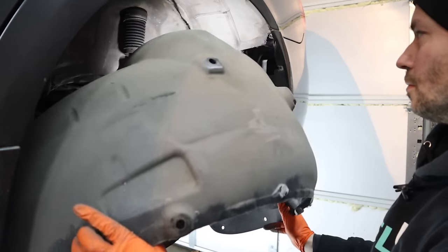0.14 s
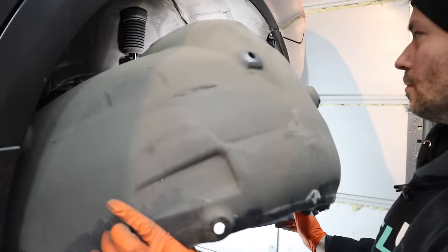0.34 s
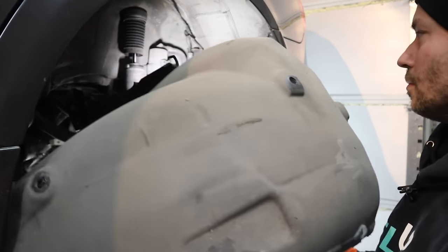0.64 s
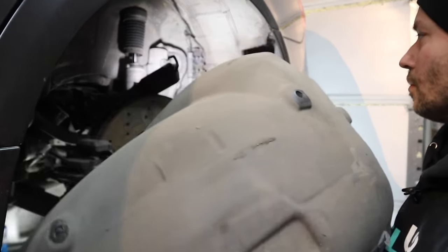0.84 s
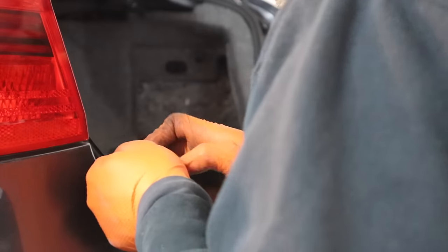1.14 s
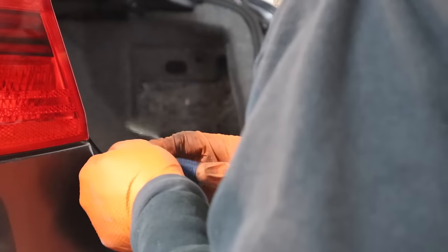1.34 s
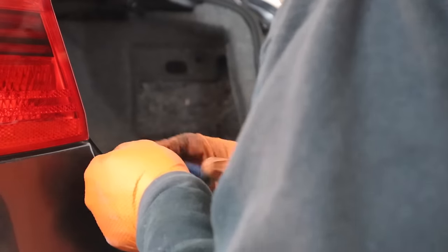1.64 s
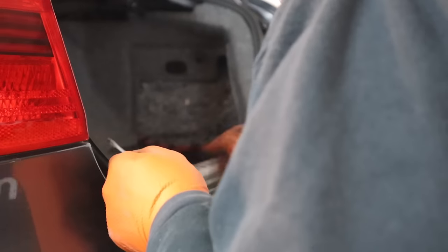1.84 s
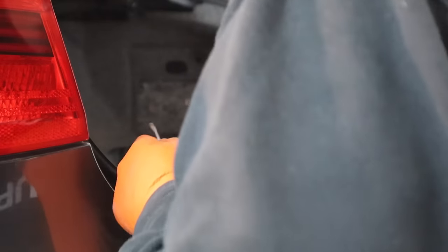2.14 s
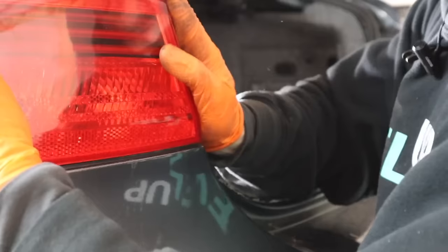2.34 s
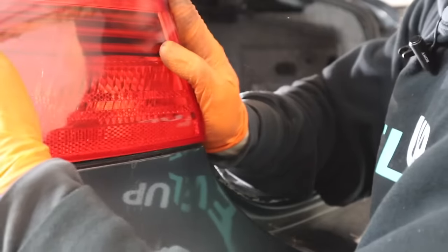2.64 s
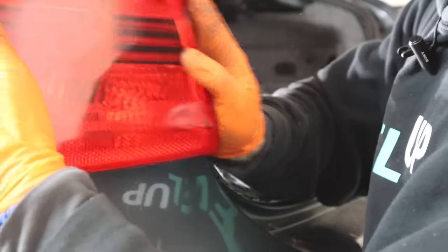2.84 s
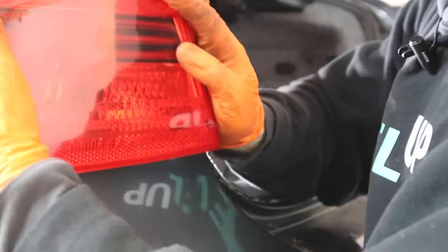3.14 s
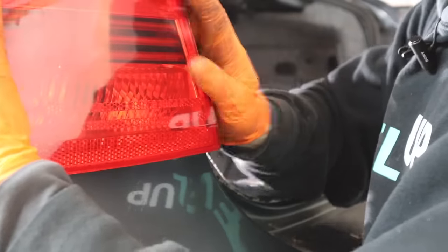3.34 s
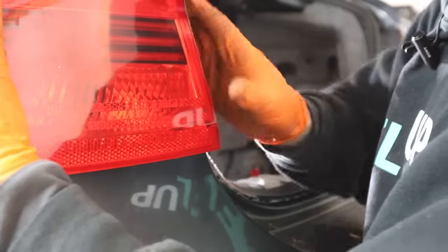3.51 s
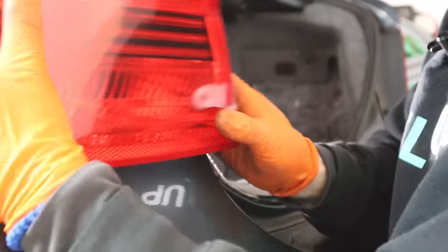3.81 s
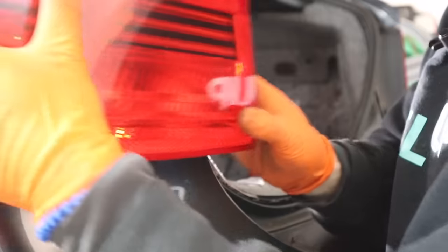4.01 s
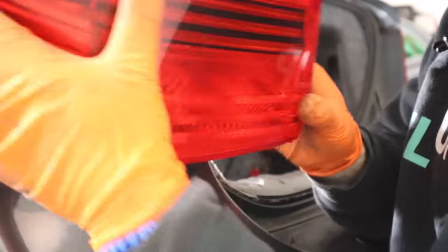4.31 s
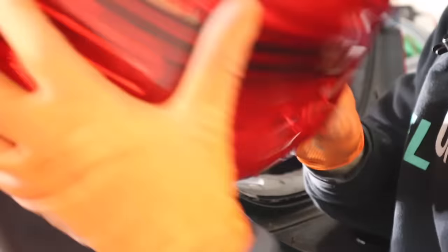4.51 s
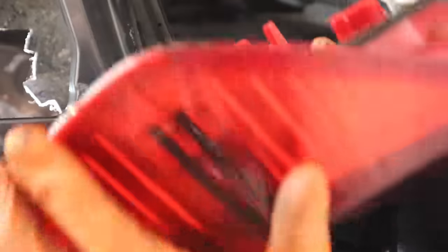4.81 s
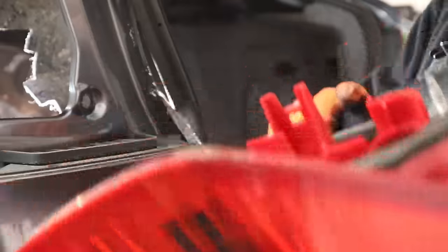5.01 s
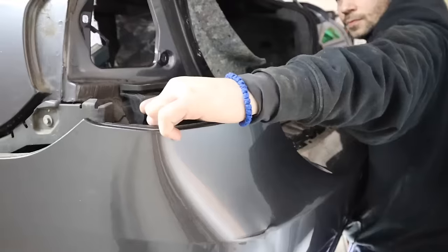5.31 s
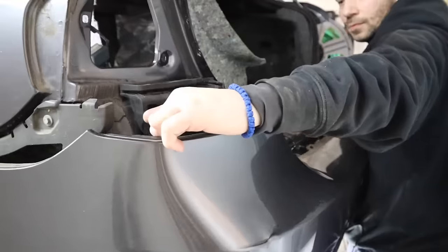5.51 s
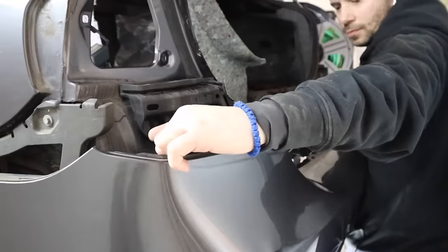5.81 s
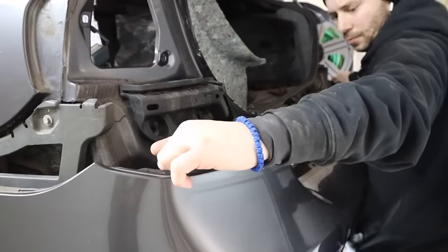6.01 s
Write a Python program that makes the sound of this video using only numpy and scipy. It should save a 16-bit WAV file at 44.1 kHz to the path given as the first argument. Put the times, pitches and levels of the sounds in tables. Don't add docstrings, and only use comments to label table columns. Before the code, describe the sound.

In a small garage, a plastic car panel thumps and knocks loose, clips snap sharply, then a lamp housing is wriggled and knocked off.

```python
import sys
import numpy as np
from scipy import signal
from scipy.fft import rfft, irfft, next_fast_len
from scipy.io import wavfile

SR = 44100
rng = np.random.default_rng(int(sys.argv[2]) if len(sys.argv) > 2 else 0)


def master(y):
    cut = np.clip(np.atleast_2d(y).T, -1, 1)
    pcm = np.round(cut * 32767)
    wavfile.write(sys.argv[1], SR, pcm.astype(np.int16))


def boost_factor(decibels):
    exponent = np.asarray(decibels, float) / 20
    return 10 ** exponent


N = 271213


def rms_one(x):
    return x / np.sqrt(np.mean(x ** 2) + 1e-20)


def band(x, lo_hz, hi_hz):
    return signal.sosfilt(signal.butter(2, [lo_hz, min(hi_hz, .45 * SR)], "band", fs=SR, output="sos"), x)


def peak(x, hz, width_hz):
    r = np.exp(-np.pi * width_hz / SR)
    numerator = np.array([1, 0, -1]) * (1 - r * r) / 2
    return signal.lfilter(numerator, [1, -2 * r * np.cos(2 * np.pi * hz / SR), r * r], x)


def coloured(x, spectrum):
    hz, level_db = np.transpose(spectrum)
    size = next_fast_len(len(x))
    f = np.maximum(np.arange(size // 2 + 1) * SR / size, 1)
    gain = boost_factor(np.interp(np.log(f), np.log(hz), level_db))
    return rms_one(irfft(rfft(x, size) * gain, size)[:len(x)])


def grit(size, per_s, spread_db):
    sizes = boost_factor(spread_db * np.minimum(rng.exponential(1, size), 4)) * rng.choice([-1, 1], size)
    clicks = sizes * (rng.random(size) < per_s / SR)
    return rms_one(clicks + 0.6 * rng.standard_normal(size))


def add(out, start_s, sound):
    i = int(start_s * SR)
    out[i:i + len(sound)] += sound[:N - i]


# freq_hz, level_db
HISS = [(12, -38), (22, -8.5), (120, -0.5), (206, -5), (700, -8), (1820, -11.5), (14700, -17.5),
        (16000, -13.5)]


def hiss():
    return boost_factor(-56) * coloured(rng.standard_normal(N), HISS)


def garage(x):
    t60_s, dull_hz, thin_hz, level_db = 0.29, 3000, 280, -10
    t = np.arange(SR // 2) / SR
    noise = signal.lfilter(*signal.butter(1, thin_hz, "high", fs=SR), rng.standard_normal(len(t)))
    dull = signal.lfilter(*signal.butter(1, dull_hz, fs=SR), noise)
    tail = dull + (noise - dull) * boost_factor(-90 * t / t60_s)
    tail = tail * boost_factor(-60 * t / t60_s) * np.minimum(t / 0.01, 1)
    return boost_factor(level_db) * signal.fftconvolve(x, tail / np.sqrt(np.sum(tail ** 2)))[:N]


# freq_hz, width_hz, level_db
LINER = [(290, 170, 21.5), (546, 3, 9), (880, 65, 21), (1230, 8.7, -27), (1350, 330, 19), (1660, 50, 6.5),
         (1940, 46, -11.5), (2610, 280, -1), (3560, 87, -9.5), (4550, 42, -15)]
CLIPS = [(251, 23, 5), (590, 17, -25), (877, 88, -1.5), (1640, 320, 8), (1970, 8.8, -30), (2600, 38, -29),
         (3000, 136, -2)]
LAMP = [(221, 19, -2), (412, 91, 5), (775, 12.4, 6.5), (1230, 12, -20), (1620, 29, -18), (2120, 30, -25)]
LAMP_FREE = [(500, 49, 1), (625, 21, 8.5), (883, 22, 2), (1330, 64, -10), (1730, 87, -9.5), (2190, 48, -10),
             (3270, 520, -19)]
PARTS = [LINER, CLIPS, LAMP, LAMP_FREE]


def body(x, modes):
    top_db = max(mode[2] for mode in modes)
    return sum((-1) ** k * boost_factor(db - top_db) * peak(x, hz, width_hz)
               for k, (hz, width_hz, db) in enumerate(modes))


# start_s, pressure_db, speed_db
RUB = [
    [(0, -35, -1.5), (.256, -45.5, 4), (.468, -46.5, -13), (.638, -51, -10), (.728, -39.5, -10),
     (.818, -40.5, -9), (.98, -47.5, 0)],
    [(.98, -45, -1), (1.156, -53, 12.5), (1.4, -45, -2), (1.464, -37, 14), (1.544, -55, 0),
     (1.746, -45, -16), (1.906, -34.5, 2.5), (2.068, -54, 3), (2.28, -48.5, 12)],
    [(2.28, -42, 4), (2.344, -49, 0), (2.468, -40, -1.5), (2.57, -38, -1.5), (2.67, -45, -0.5),
     (2.738, -42.5, -2), (2.922, -34.5, 8.5), (3.198, -44.5, -0.5), (3.42, -43, 5.5), (3.48, -51.5, 0.5),
     (3.62, -59, 8), (3.67, -45, 4), (3.78, -55.5, 7), (4.02, -45, 3), (4.12, -57, 2), (4.22, -63, 7.5)],
    [(4.22, -68, 7), (4.538, -48.5, 8.5), (4.678, -57.5, 10), (4.89, -52.5, 17), (5.016, -46, 11),
     (5.134, -52, 15.5), (5.19, -58, 16)],
]
# freq_hz, level_db_per_hz
FIZZ = [(2350, -5), (4000, -0.5), (5500, -4), (6070, -4.5), (10500, -8), (14500, -9.5), (16000, -10)]


def rub(rows, modes):
    start_s, press_db, speed_db = np.transpose(rows)
    t = np.arange(int(start_s[0] * SR), int(start_s[-1] * SR)) / SR
    slips = grit(len(t), per_s=2700, spread_db=7.5)
    rung = body(slips, modes)
    rumble = rms_one(band(rung, 78, 1130)) + 1.15 * rms_one(band(slips, 79, 750))
    rasp = rms_one(band(rung, 920, 4400)) + 0.69 * rms_one(band(slips, 795, 4900))
    sheen = coloured(grit(len(t), per_s=8300, spread_db=1.5), FIZZ)
    layers = [(rumble, 5 - speed_db), (rasp, -1 + 0.169 * speed_db), (sheen, -7.5 + 0.71 * speed_db)]
    return sum(boost_factor(np.interp(t, start_s, press_db + db) - 9.0) * rms_one(x) for x, db in layers)


def rubbing():
    out = np.zeros(N)
    for rows, modes in zip(RUB, PARTS):
        add(out, rows[0][0], rub(rows, modes))
    return out


# start_s, end_s, freq_hz, width_hz, start_db
HUMS = [(.342, .372, 670, 220, -38), (1.6, 1.645, 1350, 820, -22.5), (2.9, 3.155, 1550, 260, -52),
        (0.38, .455, 1600, 199, -33), (2.94, 2.975, 3900, 1130, -37), (2.815, 2.9, 1590, 300, -35),
        (.392, .435, 8000, 1300, -40.5), (0.4, .465, 5400, 500, -40), (1.373, 1.395, 8300, 1100, -29),
        (1.848, 1.914, 6900, 540, -42.5), (2.46, 2.656, 154.5, 4.1, -40.5), (3.401, 3.623, 124, 50, -48.5),
        (3.819, 4.02, 1630, 640, -52.5), (4.044, 4.058, 1070, 190, -35), (4.0, 4.016, 1450, 220, -38),
        (4.4, 4.71, 377, 43, -56), (4.47, 4.71, 497, 15, -57), (4.52, 4.575, 613, 15, -48.5),
        (4.85, 5.07, 474, 7.7, -53.5), (4.856, 5.163, 353, 23, -54), (5.07, 5.1, 400, 92, -46),
        (4.47, 4.66, 1680, 120, -58.5), (1.595, 1.64, 390, 200, -27), (5.11, 5.25, 420, 190, -46),
        (5.02, 5.1, 1620, 110, -60)]


def hums():
    out, t = np.zeros(N), np.arange(SR // 2) / SR
    fade_db, edge_s = 5.5, 0.00935
    for start_s, end_s, hz, width_hz, start_db in HUMS:
        width_hz = max(width_hz, .03 * hz)
        tone = peak(peak(rng.standard_normal(SR), hz, width_hz), hz, 4 * width_hz)[SR // 2:]
        length_s = end_s - start_s
        edges = np.clip(np.minimum(t, length_s - t) / edge_s, 0, 1)
        level_db = np.interp(t, [0, length_s], [start_db, start_db - fade_db])
        add(out, start_s, rms_one(tone) * edges * boost_factor(level_db))
    return out


# start_s, peak_db, freq_hz, t60_s
THUDS = [(0.147, -29.5, 106.4, 0.43), (0.29, -36.5, 133, 0.31), (0.429, -24.5, 60.6, 0.2),
         (0.627, -30.5, 124.5, 0.32), (1.398, -25, 108, 0.2), (2.308, -37, 121, 0.13),
         (2.499, -33, 83.4, 0.18), (2.724, -24.5, 84, 0.15), (2.835, -25, 141, .15),
         (2.918, -28.5, 114.7, 0.3), (3.06, -35, 119, 0.12), (3.257, -23, 118.6, 0.23),
         (4.028, -42, 137, 0.27)]


def thuds():
    out, t = np.zeros(N), np.arange(SR // 2) / SR
    for start_s, level_db, hz, t60_s in THUDS:
        swell = (1 - np.exp(-t * hz * 1.3)) * boost_factor(-60 * t / max(t60_s, .03))
        add(out, start_s - .004, boost_factor(level_db - 1.5) * swell * np.sin(2 * np.pi * hz * t))
    return out


# start_s, freq_hz, level_db, t60_s, rise_s
RINGS = [(.44, 332, -36, .7, .012), (.455, 520.2, -28.5, 0.47, 0.0097), (.47, 552, -31, .5, .015),
         (.45, 837, -42, 0.56, .01), (.45, 969, -42, .6, .01), (.45, 1093, -41, .5, .01),
         (.45, 1222, -41, .7, .01), (.45, 1432, -40, .45, .01), (.46, 1680, -36, .8, .015),
         (.47, 1966, -40, .25, .01), (1.583, 822, -22, 0.097, 0.0037), (1.584, 1640, -28, 0.13, 0.0067),
         (1.584, 1854, -29, 0.15, .004), (1.583, 2040, -27, 0.22, .004), (1.59, 294, -25, 0.31, 0.0071),
         (1.784, 626, -31, .1, .003), (2.73, 205, -28, 0.13, .006), (2.796, 3870, -28, .012, .001),
         (2.804, 3960, -17.5, 0.013, 0.0009), (2.834, 1230, -19.5, 0.047, 0.0013),
         (2.724, 1730, -34, 0.048, .002), (3.232, 1557, -32.5, 0.076, 0.0018),
         (4.029, 1614, -35, 0.073, 0.0035), (4.029, 1154, -38, 0.13, 0.0026), (4.03, 848, -36, 0.092, .002),
         (4.03, 590, -34.5, .1, .002), (4.043, 353.3, -30.5, 0.17, 0.011), (4.045, 746, -38, 0.087, .005),
         (4.522, 4450, -42, .07, .006),
         (.2, 506, -29, 0.14, .004), (.2, 864, -32, 0.092, 0.0033), (.204, 1070, -37.5, .12, 0.0027),
        (.196, 1700, -45, 0.088, .003), (.624, 704, -23.5, 0.049, .002), (0.625, 1390, -29, 0.071, .001),
        (.624, 1890, -26.5, 0.038, .001), (.75, 2430, -29, 0.044, .002), (0.798, 2510, -24, 0.041, 0.0016),
        (.797, 880, -27, 0.065, 0.0018), (.73, 900, -38, 0.056, .005), (.933, 305, -29, 0.13, 0.0046),
        (1.612, 604, -19, 0.089, 0.0086), (1.612, 853, -21, 0.11, 0.0058), (1.615, 1640, -21, .09, .006),
        (1.59, 2600, -25, 0.1, .005), (1.72, 290, -25, 0.24, 0.007), (1.784, 1710, -26, 0.094, 0.0025),
        (1.786, 1050, -32, 0.075, .003), (2.3, 237.4, -34, .12, .006), (2.458, 1590, -44, 0.06, 0.0027),
        (2.488, 910, -36, .06, .003), (2.509, 1230, -37, .06, .003), (2.513, 2680, -44, .11, .005),
        (2.588, 2650, -44, .06, .004), (2.598, 1250, -36, .07, .003), (2.612, 560, -36, .07, .004),
        (2.646, 2680, -48, .04, .003), (2.694, 2680, -45, .04, .002), (2.897, 559, -20, 0.06, .002),
        (3.236, 565, -27, 0.07, 0.0066), (3.27, 159.8, -30, 0.4, 0.017), (3.895, 1440, -41, .1, .005),
        (3.973, 1590, -43, 0.23, .006), (4.045, 483.7, -39.5, 0.19, .006), (4.478, 500, -43, 0.13, 0.0036),
        (4.848, 471, -39, 0.18, 0.0065), (5.037, 500, -43, 0.11, 0.005), (5.077, 478, -42, 0.11, .003),
        (5.135, 500, -46, 0.093, .004)]


def rings():
    out, t = np.zeros(N), np.arange(SR // 3) / SR
    waver, waver_hz = .25, 37
    for start_s, hz, level_db, t60_s, rise_s in RINGS:
        shape = (1 - np.exp(-t / max(rise_s, .001))) * boost_factor(level_db - 60 * t / max(t60_s, .008))
        beat = 1 + waver * np.sin(2 * np.pi * waver_hz * (hz / 1000) ** .3 * t + hz)
        end_fade = np.minimum(10 * (t[-1] - t), 1)
        add(out, start_s, shape * beat * np.sin(2 * np.pi * hz * t) * end_fade)
    return out


# start_s, peak_db, ring_hz, t60_s
TICKS = [(0.265, -37, 5070, .008), (0.626, -15.5, 1730, 0.029), (.712, -39, 6030, 0.0047),
         (1.217, -35, 1310, 0.023), (1.332, -39, 5000, 0.0051), (1.582, -8.5, 1610, 0.0039),
         (1.7161, -15, 1730, 0.0052), (1.849, -43, 3000, 0.0063), (2.392, -26, 10500, .004),
         (2.489, -19.5, 4000, 0.0094), (2.726, -25, 3000, 0.0094), (2.797, -29, 9850, 0.0034),
         (2.834, -26, 2500, 0.0097), (3.022, -28.5, 1550, 0.016), (1.784, -27, 1600, 0.0081),
         (0.7348, -30, 2100, .01), (0.75, -28, 3000, .008), (1.38, -24, 3100, .01), (1.592, -9, 1630, .008),
         (.393, -23.5, 2550, .006), (.432, -19.5, 2000, .008), (2.8984, -14, 1430, 0.017),
         (3.069, -34, 5850, .005), (3.234, -31, 1450, 0.025), (4.028, -30, 1510, .012),
         (4.524, -42, 4500, 0.032), (4.715, -41, 4470, .01), (3.532, -41, 4980, 0.0093),
         (2.6, -30, 3870, .006), (1.367, -45, 2500, 0.0036), (5.132, -37.5, 2960, .015)]


def ticks():
    out = np.zeros(N)
    click = np.append(-1., np.zeros(SR // 20)) + 1e-18
    for start_s, level_db, hz, t60_s in TICKS:
        crack = band(click, .3 * hz, 1.8 * hz)
        ring = peak(click, hz, 2.2 / np.clip(t60_s, .002, .02))
        add(out, start_s, boost_factor(level_db) * (.8 * crack / np.ptp(crack) + .5 * ring / np.max(ring)))
    return out


def tab(x, chance):
    low_hz, high_hz, q, share = 1200, 12000, 35, .13
    pitches_hz = low_hz * (high_hz / low_hz) ** chance
    return x + share * sum(4 * peak(x, hz, hz / q) for hz in pitches_hz)


# start_s, end_s
SHOTS = [
    (0, 0.63),
    (.98, 2.23),
    (2.28, 4.22),
    (4.222, 13),
]


def edges(table, swell):
    out, drive, t = np.zeros(N), np.zeros(N), np.arange(SR // 4) / SR
    slips = grit(N + SR, per_s=5000, spread_db=2.8)
    clumps = rms_one(band(rng.standard_normal(N + SR), 20, 120))
    slips = slips * boost_factor(1.7 * clumps)
    fizz = coloured(grit(N + SR, per_s=6000, spread_db=3.0), FIZZ)
    tab_modes = (np.arange(12) + rng.random((len(table), 12))) / 12
    for (start_s, level_db, fizz_db, hz, chatter_s, t60_s), chance in zip(table, tab_modes):
        i = int(start_s * SR)
        after = np.maximum(t - chatter_s, 0) / max(t60_s, .01)
        shape = (1 - np.exp(-t / (0.00078 + swell * chatter_s))) * boost_factor(level_db - 12.0)
        if swell == 0:
            shape = shape * (1 + .9 * np.exp(-t / .005))
        push = rms_one(tab(slips[i:i + len(t)], chance))
        broad = rms_one(band(band(push, 0.29 * hz, 1.8 * hz), 100, 2.9 * hz))
        pitch = rms_one(peak(push, hz, 0.089 * hz))
        edge = rms_one(broad + 0.5 * boost_factor(min(fizz_db, 0) * -0.2 - 2.5) * pitch)
        middle = rms_one(band(push, 430, 3700))
        edge = edge * boost_factor(-60 * after) + boost_factor(-6.0) * middle * boost_factor(-45 * after)
        edge = band(edge, 90, 5950)
        top = boost_factor(fizz_db) * rms_one(tab(fizz[i:i + len(t)], chance)) * boost_factor(-75 * after)
        add(out, start_s, shape * (edge + top))
        add(drive, start_s, shape * push * boost_factor(-60 * after))
    for (start_s, end_s), modes in zip(SHOTS, PARTS):
        held = body(drive[int(start_s * SR):int(end_s * SR)] + 1e-18, modes)
        add(out, start_s, boost_factor(16.0) * band(held, 190, 3200))
    return out


# start_s, peak_db, fizz_db (relative to the edge), centre_hz, chatter_s
SCRAPES = [(.029, -59, -5, 1080, 0.017), (.064, -30.5, -29, 1420, 0.012), (0.382, -21.5, -3.5, 1990, 0.051),
           (0.748, -26.5, -9, 2450, 0.0061), (.939, -37.5, -20, 1150, 0.0071),
           (1.605, -23.5, -35, 880, 0.024), (2.213, -39.5, -1, 2030, 0.088),
           (2.269, -41.5, -19, 1230, 0.097), (2.41, -38.5, -4, 2600, 0.034), (2.456, -33, -15, 1390, 0.052),
           (2.589, -30, -14, 1210, 0.013), (2.826, -28, -8, 2100, 0.027), (2.946, -24, -1.5, 1490, 0.01),
           (3.099, -26.5, -4.5, 1420, 0.039), (3.348, -40, -2, 1620, 0.042),
           (3.418, -39.5, 1.5, 3000, 0.022), (3.556, -46.5, 5, 1620, 0.0075), (3.696, -44, 0, 3600, 0.035),
           (3.823, -43, -8, 2520, 0.13), (3.889, -38, -14, 1540, 0.012), (4.515, -41, -20, 4230, 0.015),
           (4.619, -51, 5.5, 1730, 0.04), (4.839, -43.5, 2.5, 4200, 0.075), (5.119, -49.5, 0, 2950, 0.043)]


def scrapes():
    t60_s = 0.11
    return edges([(*row, t60_s) for row in SCRAPES], swell=0.11)


# start_s, peak_db, fizz_db (relative to the edge), centre_hz, t60_s
SNAPS = [(0.193, -37, -18, 1510, 0.12), (0.262, -49, 6, 3780, 0.057), (0.343, -41, -27, 1340, 0.08),
         (0.374, -25.5, -35, 1930, 0.18), (0.43, -27, -3, 1940, 0.24), (0.624, -24.5, -37.5, 1470, 0.11),
         (0.706, -36, -5, 2400, 0.35), (.795, -22, -28, 1330, 0.15), (1.217, -41.5, 6, 1730, 0.06),
         (1.329, -41.5, -2.5, 2610, 0.024), (1.362, -12, 2.5, 1840, 0.33), (1.582, -11.5, -20, 1485, 0.22),
         (1.7158, -13, -17, 1790, 0.13), (1.783, -28, -36, 1640, 0.16), (1.849, -19, -10, 1450, 0.11),
         (2.39, -33.5, -4.5, 2560, 0.093), (2.488, -28.5, -15, 3630, 0.019),
         (2.692, -41.5, -14, 2600, 0.17), (2.723, -22.5, -35, 1660, 0.056), (2.795, -30, -4.5, 1530, 0.24),
         (2.895, -15, -15, 1440, 0.077), (3.064, -28, -18, 1350, 0.12), (3.233, -33.5, -39, 1130, 0.15),
         (4.029, -30, -20, 1340, 0.062)]


def snaps():
    return edges([(*row[:-1], 0.007 + 0.075 * row[-1], row[-1]) for row in SNAPS], swell=0)


# start_s, peak_db, main_hz, t60_s, upper_modes_db
LINER_KNOCKS = [(.019, -39, 314, 0.15, -19), (.144, -29.5, 201.6, 0.6, -9.5), (.2, -20, 322, 0.2, -22),
                (.241, -20, 280, 0.069, -28), (.289, -45.5, 254, 0.088, -29),
                (.384, -30, 313.6, 0.49, -11.5), (.432, -16.5, 310, 0.12, -11.5),
                (.6225, 1, 331, 0.043, -26.5), (.644, -11, 310, 0.072, -13.5),
                (.801, -16, 301, 0.084, -10.5), (.82, -19.5, 291, 0.23, -15),
                (.953, -22.5, 250, 0.078, -9.5)]
CLIP_KNOCKS = [(1.188, -47.5, 226, 0.17, -20), (1.364, -15.5, 236.5, 0.33, -8.5),
               (1.408, -14, 242, 0.054, -13), (1.469, -30.5, 155, .15, -24), (1.581, -9.5, 558, 0.042, -36),
               (1.599, -14, 583.4, 0.18, -38), (1.719, -23, 399, 0.11, -20), (1.846, -25, 446, 0.093, -12)]
LAMP_KNOCKS = [(2.313, -30.5, 169, 0.22, -17), (2.599, -29, 545, 0.079, -18),
               (2.723, -20.5, 362.3, 0.16, -30), (2.829, -21, 365, 0.26, -16),
               (2.896, -8.5, 392, 0.093, -23), (2.904, -8, 215.5, 0.18, -16), (2.959, -17, 452, 0.11, -25),
               (3.025, -17, 443, 0.021, -12.5), (3.064, -13, 195, 0.12, -18),
               (3.114, -14.5, 221, .15, -15.5), (3.233, -13.5, 400, 0.051, -12.5),
               (3.243, -13.5, 216, 0.144, -16), (4.036, -39, 174, 0.12, -7), (4.531, -65, 366, 0.066, -11),
               (5.071, -48, 358, 0.081, -14)]
SIDE_MODES = [0.497, 0.662, 0.819, 1.25, 1.55, 2.0]


def knocks():
    out, t = np.zeros(N), np.arange(SR // 2) / SR
    blows = LINER_KNOCKS + CLIP_KNOCKS + LAMP_KNOCKS
    chances = rng.random((len(blows), 3, 7))
    for (start_s, level_db, hz, t60_s, upper_db), (detune, share, turn) in zip(blows, chances):
        t60_s = max(t60_s, .02)
        lower_db = -11 - 0.1573 * (level_db + 22.0) - 0.5 * np.log2(10 * t60_s)
        ratio = np.append(1, np.array(SIDE_MODES) * (.93 + 0.179 * detune[1:]))[:, None]
        side_db = np.repeat([lower_db, upper_db], 3) - 6 * share[1:] + 6.5
        gain = boost_factor(np.append(0, side_db))[:, None]
        fall = boost_factor(-60 * t * ratio ** .5 / t60_s) * (1 - np.exp(-t * hz * ratio * 2.0))
        fall = fall * (0.8 + 0.42 * np.exp(-(t * hz / 2.8) ** 2))
        waver = .11 * np.sin(2 * np.pi * (hz * .11 * t + turn[:, None]))
        rattle = rms_one(band(rng.standard_normal(fall.shape), 12, 140))
        wave = np.sin(2 * np.pi * (hz * ratio * t + waver - waver[:, :1])) * (1 + .4 * rattle)
        add(out, start_s + 60 / SR, boost_factor(level_db - 3.5) * np.sum(gain * fall * wave, axis=0))
    return out


def scene():
    parts = rubbing() + hums() + thuds() + rings() + ticks() + scrapes() + snaps() + knocks()
    parts += garage(parts)
    parts = signal.sosfilt(signal.butter(3, 70, "high", fs=SR, output="sos"), parts)
    t = np.arange(N) / SR
    fade = np.clip((.985 - t) / 0.015, 0, 1) + np.clip((t - 1.0) / 0.2, 0, 1)
    fade *= np.clip((5.2 - t) / 0.046, 0, 1)
    return (parts * fade + hiss())[None]


def roll_off(x):
    return signal.sosfilt(signal.butter(12, 16800, fs=SR, output="sos"), x)


def record(dry):
    rounded = 0.8 * np.tanh(dry / 0.8)
    top_cut = signal.cheby2(10, 70, 17000, fs=SR, output="sos")
    return roll_off(signal.sosfilt(top_cut, rounded))


dry = scene()
out = record(dry)
master(out)
```